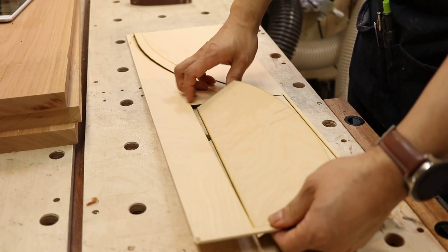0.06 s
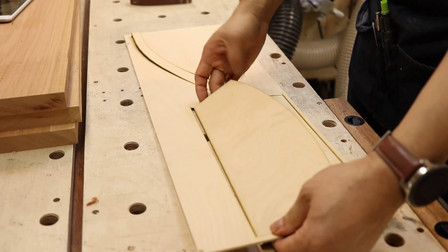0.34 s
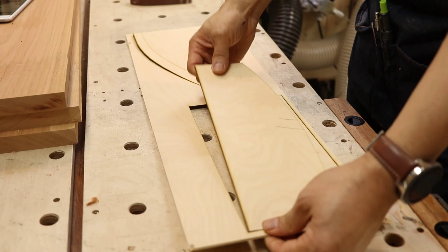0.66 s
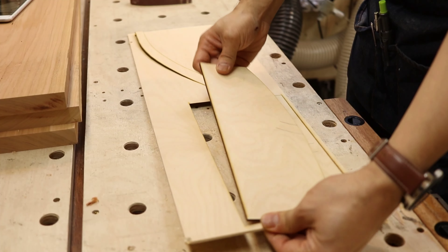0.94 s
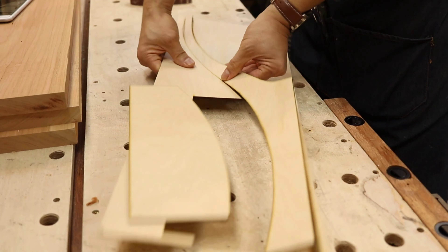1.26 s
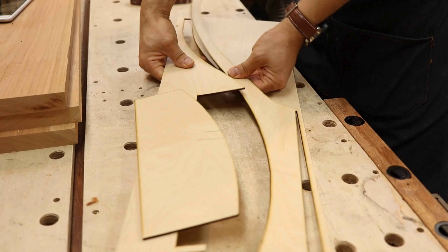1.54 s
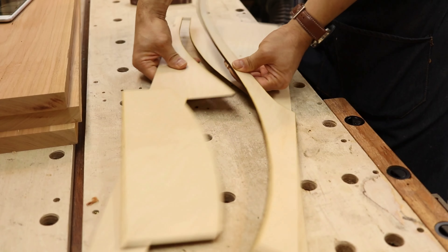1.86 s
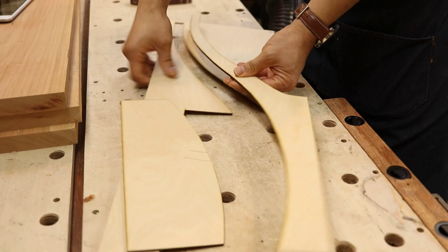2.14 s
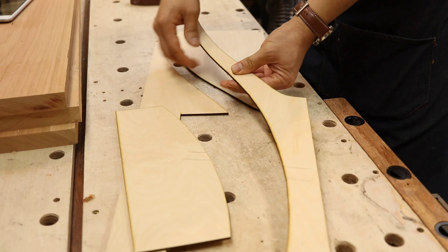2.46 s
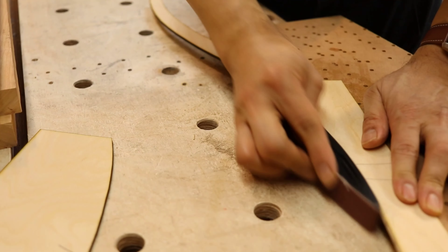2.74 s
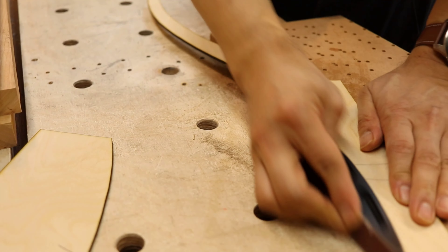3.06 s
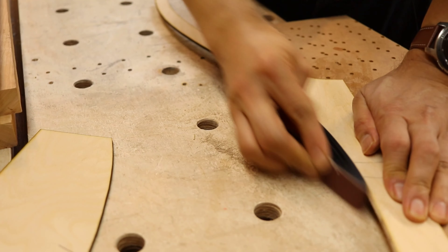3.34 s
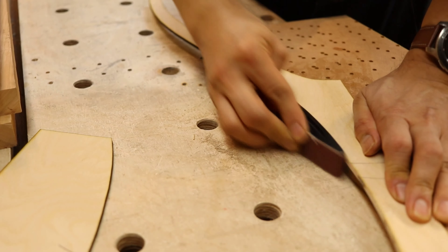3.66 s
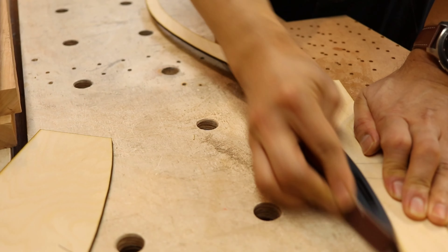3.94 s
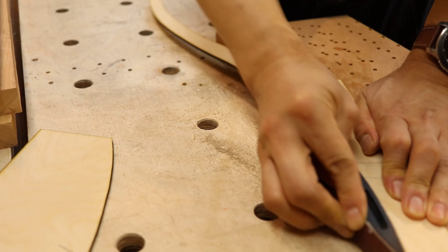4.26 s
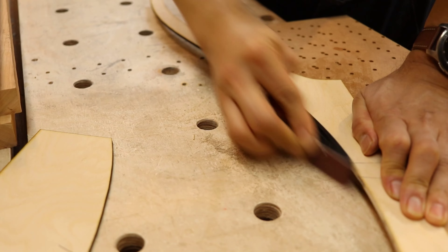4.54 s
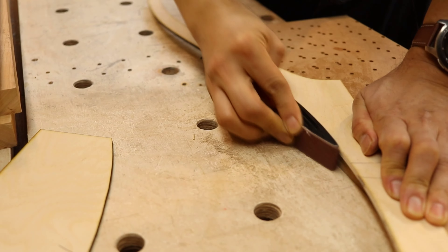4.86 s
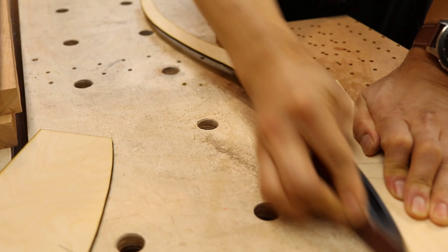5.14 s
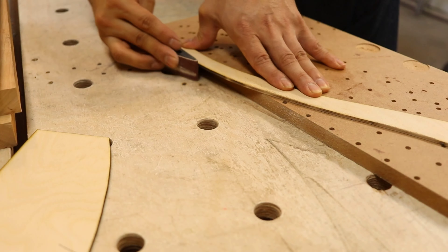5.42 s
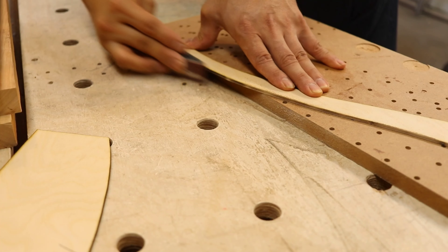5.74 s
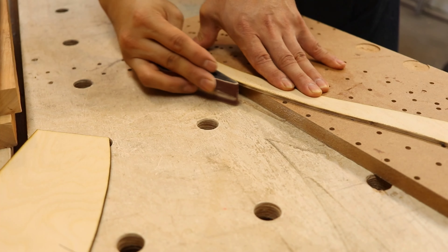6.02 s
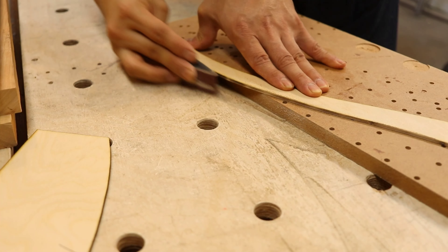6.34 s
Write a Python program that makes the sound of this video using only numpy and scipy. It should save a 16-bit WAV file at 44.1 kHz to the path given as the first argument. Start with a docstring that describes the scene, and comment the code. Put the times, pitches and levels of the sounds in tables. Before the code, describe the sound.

Light wooden knocks and scrapes from handled plywood give way to quick, rhythmic hand sanding in a small, quiet workshop.

```python
"""Plywood pieces and a sanding block

Thin plywood pieces creak out of their cut-out sheet by stick-slip friction, clatter together as
impacts excite their bending modes, and are laid on a resonant workbench. Then a sanding block rasps
back and forth along an edge; the faster it moves, the more grains strike each second and the higher
its grit sings. One close microphone hears it all in a small, quiet workshop."""
import sys
import numpy as np
from scipy import signal
from scipy.fft import rfft, irfft, next_fast_len
from scipy.io import wavfile
from scipy.ndimage import uniform_filter1d, map_coordinates

SR = 44100
rng = np.random.default_rng(int(sys.argv[2]) if len(sys.argv) > 2 else 0)


def int16_out(signal):
    """Quantize to a 16-bit WAV file."""
    q = np.round(np.clip(np.atleast_2d(signal).T, -1, 1) * 32767)
    wavfile.write(sys.argv[1], SR, q.astype(np.int16))


N = 281621
TIME = np.arange(N) / SR
SHORT = 8192  # samples in one contact sound
SHORT_T, SHORT_HZ = np.arange(SHORT) / SR, np.fft.rfftfreq(SHORT, 1 / SR)

# wooden contacts: t/s, peak level/dB, relative thud/dB, relative crack/dB, contact pitch/Hz
IMPACTS = [(0.387, -21.5, -18.5, -15, 2300), (0.397, -23, -27, -14, 2770), (0.439, -22, -39, -12, 3360),
           (0.45, -17.5, -18.5, -12, 886), (0.518, -24, -16.5, -13.5, 860), (0.801, -25, -45, -13, 1510),
           (0.814, -24.5, -22, -15.5, 1480), (1.103, -25, -54, -10.5, 3680), (1.141, -31, -21, -16, 810),
           (1.216, -28, -22, -11.5, 3570), (1.304, -23, -31, -14, 1100), (1.327, -16.5, -43, -15, 2380),
           (1.332, -17.5, -44, -13.5, 3700), (1.377, -17.5, -36, -24, 1480), (1.38, -14, -31, -30, 2260),
           (1.385, -14, -38, -14, 3500), (1.402, -22.5, -19.5, -16, 800), (1.528, -33, -19, -19, 820),
           (1.659, -25, -29, -8, 2760), (1.668, -9, -30.5, -13.5, 3420), (1.675, -13.5, -25, -21, 3020),
           (1.707, -23.5, -35, -22, 3150), (1.719, -14, -42, -13.5, 3180), (1.723, -18, -33, -11, 3420),
           (1.897, -23.5, -43, -10, 3000), (1.902, -19.5, -45, -8.5, 1360), (1.914, -21, -50, -17, 2100),
           (1.939, -16, -26, -21, 2150), (1.954, -19.5, -17, -12, 1760), (1.966, -20.5, -21.5, -44, 990),
           (2.012, -25, -18, -17, 2210), (2.025, -15.5, -31, -38, 2120), (2.062, -33.5, -26, -5, 974),
           (2.148, -36, -26, -36, 1770), (2.295, -34, -31, -8, 3620), (2.354, -26.5, -12, -11.5, 940),
           (2.542, -43, -21, -23, 2860), (2.79, -43, -20, -14, 2870), (2.822, -40.5, -4.5, -12, 721),
           (6.192, -30, -10.5, -20, 1610)]
# spectra of a loose piece, the bench's thud and the edge's crack: f/Hz, level/dB
PLY_SPECTRUM = [(100, -25), (400, -1), (800, 4.5), (1500, 6.5), (3400, 5), (4300, -0.5), (6000, -9.5),
                (9000, -19), (16000, -28.5)]
THUD_SPECTRUM = [(50, -14.5), (140, -8), (260, -6), (390, 2), (520, 4), (900, -23), (3000, -53)]
CRACK_SPECTRUM = [(2500, -30), (4500, 6), (5900, 13), (7000, 6.5), (8200, 9), (11000, -3.5), (16000, -18)]
# resonances of a loose piece: f/Hz, width/Hz, gain/dB
PLY_RESONANCES = [(980, 43, 5.1), (1430, 100, 4.5), (2320, 85, 1.3), (3380, 42, 0.69), (3490, 150, 1.2)]
# creaks: t/s, length/s, first slip rate/Hz, last slip rate/Hz, peak level/dB, fade/dB,
# relative thud/dB, relative crack/dB, contact pitch/Hz, gain at that pitch/dB
SLIP_TRAINS = [(0.1125, 0.017, 236, 207, -21.5, -11, -38, -14.5, 2160, 13.5),
               (0.452, .016, 900, 900, -22, 9, -33, -10, 2650, 9),
               (0.6994, 0.031, 350, 230, -20, -5.5, -35, -10, 1940, 5),
               (0.737, 0.018, 320, 295, -24, 18, -34, -23, 1600, 3)]
# course of the squeal: t/s, f/Hz, level/dB
SQUEAL_CONTOUR = [(.452, 930, -52), (.457, 926, -34.5), (.464, 896, -24.5), (.472, 882, -26),
                  (.479, 900, -35), (.483, 870, -90)]
# sanding strokes, each lasting until the next: t/s, midway level/dB, growth/dB, attack/s, release/s,
# time to top speed/s, grain rate at top speed/Hz, crackle pitch at top speed/Hz
SANDING_STROKES = [(2.846, -28.9, 1.5, 0.012, 0.15, 0.092, 2700, 2020),
                   (3.086, -30.2, 12.5, 0.027, 0.16, 0.22, 4130.0, 3110.0),
                   (3.418, -32, 0, 0.019, 0.082, 0.073, 2850, 2770),
                   (3.634, -30.5, -6.5, 0.027, 0.079, 0.16, 4890.0, 3920.0),
                   (3.855, -31, 4.5, 0.0055, 0.079, 0.072, 3420, 3230),
                   (4.053, -31, -7.5, 0.019, 0.039, 0.096, 5170.0, 3130),
                   (4.236, -30, 14, 0.002, 0.075, 0.061, 5050.0, 3360.0),
                   (4.435, -30.5, -6, 0.016, 0.043, 0.114, 5540.0, 3060),
                   (4.63, -30, 7.5, 0.033, 0.075, 0.06, 4860.0, 3650),
                   (4.834, -30.5, -11, 0.013, 0.049, 0.12, 5670.0, 3300.0),
                   (5.045, -29, 9, 0.0065, 0.066, 0.058, 3330, 3460.0),
                   (5.239, -30, -8, 0.012, 0.002, 0.11, 5190.0, 3040),
                   (5.441, -32, 5, 0.0019, 0.004, 0.05, 4970, 2910.0),
                   (5.612, -25, 23, 0.002, 0.19, 0.14, 7500.0, 5100.0),
                   (5.787, -35, -3, 0.002, 0.002, 0.081, 1710, 2120),
                   (5.957, -33.6, -15, 0.071, 0.074, 0.086, 1530, 2420.0),
                   (6.184, -35, -9.5, 0.01, 0.097, 0.11, 1900, 2200)]
# spectrum due to the spread of fibre sizes: f/crackle pitch, level/dB
GRIT_SPECTRUM = [(.06, -13.5), (.25, -6), (.5, -1.5), (.7, -0.5), (1.05, 1.5), (1.4, 0.5), (2, -2),
                 (4, -10), (11, -29.5)]
# radiation of the held piece: f/Hz, level/dB
HELD_SPECTRUM = [(40, -10.5), (150, -5.5), (400, -5.5), (750, 0.5), (1300, -1), (1900, -1.5), (3400, -3),
                 (4300, -10), (5900, -5), (7000, -11), (9000, -6.5), (15500, -15)]
# its resonances, and those that sing when the grain rate meets them: f/Hz, width/Hz, gain/dB
HELD_RESONANCES = [(135, 30, -9), (277, 36, 8.5), (491, 46, 8), (720, 55, 8), (1240, 100, 3),
                   (2360, 82, -0.5), (5330, 330, 1.5)]
SINGING_RESONANCES = [(1180, 300, 8), (2610, 230, 8), (5300, 570, 3.5)]
# pieces settling flat on the bench: t/s, level/dB, most strongly driven f/Hz
LANDINGS = [(0.116, -45, 426), (0.39, -48.5, 397), (0.461, -44, 320), (0.52, -40.5, 420),
            (1.145, -50.5, 190), (1.384, -46, 190), (2.014, -43.5, 237), (2.354, -38.5, 157)]
# modes of the bench top: f/Hz, relative level/dB, T60/s
BENCH_MODES = [(81.5, -1.5, 0.58), (141, -1.5, 0.36), (174.7, -8, 0.39), (214.5, -5, 0.47),
               (273, -34, 0.16), (307.6, 2, 0.19), (395.4, 7.5, 0.17), (496, -22, 0.2), (643, -22, 0.18),
               (840, 2, .2)]
# sliding contacts: t of firmest pressure/s, swell/s, fade/s, rub level/dB, hiss level/dB
SLIDE_GESTURES = [(.044, 0.11, 0.055, -52, -48), (.105, 0.033, .03, -52, -68),
                  (.17, 0.033, 0.11, -44.5, -65), (.25, 0.13, 0.063, -43, -49),
                  (.375, 0.15, 0.016, -54.5, -58), (.698, 0.051, .01, -55.5, -50.5),
                  (0.851, 0.026, 0.094, -47, -52.5), (1.095, 0.16, 0.023, -54.5, -60),
                  (1.155, 0.043, 0.073, -46, -50), (1.58, .06, 0.13, -57.5, -72),
                  (2.09, 0.018, 0.35, -55, -63), (2.335, .3, 0.054, -48, -48.5),
                  (2.37, 0.011, 0.039, -34, -45), (2.627, .06, 0.062, -53.5, -56.5),
                  (2.76, .04, 0.04, -57, -72)]
# spectra of wood on wood, fingers on veneer and the shop's background: f/Hz, level/dB
RUB_SPECTRUM = [(150, -9.5), (400, -4.5), (800, 2), (1500, -1), (3300, 1.5), (4500, -7.5), (6000, -8.5),
                (8000, -51), (16000, -50)]
HISS_SPECTRUM = [(4000, -8.5), (6000, 2), (8500, 4), (12000, -8), (16000, -21)]
AMBIENT_SPECTRUM = [(25, -26), (48, 8), (64, -2), (82, 6.5), (104, -40), (140, 4), (200, -17), (400, -40),
                    (620, -36), (930, -18), (1200, -14), (2700, -17.5), (6000, -19), (16000, -24.5)]
# reverberation time of the workshop: f/Hz, T60/s
ROOM_T60 = [(100, 1), (500, 0.59), (1400, 0.32), (3700, 0.27), (10000, 0.26), (16000, 0.16)]


def knocks(spiky_db=4, first_touch=3, chatter_s=0.013, halving_db=13, sheet_db=-28, sheet_t60=0.098):
    """Impact and rebound: a first touch, then a dying chatter that lasts longer in light contacts."""
    out = np.zeros(N)
    for s, db, thud_db, crack_db, contact_hz in IMPACTS:
        chatter_t60 = chatter_s * 2 ** (-db / halving_db)
        size, spread, tail = rng.standard_normal((3, SHORT))
        force = size * unit(amp(spiky_db * spread)) * amp(-60 * SHORT_T / chatter_t60)
        force[0] = first_touch
        force += tail * amp(sheet_db - 60 * SHORT_T / sheet_t60)  # bending waves linger in the sheet
        focus_db = max(17 + 0.28 * db, 4)  # harder blows rebound and leave the sheet free to ring
        add(out, s, amp(db) * plywood(force, thud_db, crack_db, contact_hz, focus_db))
    return out


def plywood(force, thud_db, crack_db, contact_hz, focus_db, focus_octaves=0.16, wood_db=-9, crest_db=8):
    """Forced response: the sheet rings, the bench thuds and the edge cracks; peak about 1."""
    focus = focus_db * bell(np.log2((SHORT_HZ + 1) / contact_hz) / focus_octaves)
    tuning = np.exp(0.048 * rng.standard_normal())  # every piece and grip shifts the modes a little
    wood = ring(force, along(PLY_SPECTRUM, SHORT_HZ) + peaks(PLY_RESONANCES, SHORT_HZ * tuning) + focus)
    thud = ring(force, along(THUD_SPECTRUM, SHORT_HZ))
    crack = ring(force, along(CRACK_SPECTRUM, SHORT_HZ))
    sound = amp(wood_db) * wood + amp(thud_db) * thud + amp(crack_db) * crack
    loudest_rms = np.sqrt(uniform_filter1d(sound ** 2, size=128).max())
    return sound / loudest_rms / amp(crest_db)


def creaks(jitter=0.1, rub_db=-17, rub_t60=0.043):
    """Stick-slip friction: a tight edge yields in jerks, each an impulse with a short rub behind it."""
    out = np.zeros(N)
    for s, length, first_hz, last_hz, db, fade_db, thud_db, crack_db, contact_hz, focus_db in SLIP_TRAINS:
        rates = np.linspace(first_hz, last_hz, int(length * (first_hz + last_hz) / 2) + 1)
        gaps = (1 + jitter * rng.standard_normal(len(rates))) / rates
        force = np.zeros(SHORT)
        for at in np.cumsum(gaps) - gaps[0]:
            slip = rng.standard_normal(SHORT) * amp(rub_db - 60 * SHORT_T / rub_t60)
            slip[0] = 1
            add(force, at, slip * amp(rng.standard_normal() - fade_db * at / length))
        add(out, s, amp(db) * plywood(force, thud_db, crack_db, contact_hz, focus_db))
    return out


def squeal(waver=0.029, rasp_db=-5, overtone_db=-10):
    """Self-excited oscillation: an edge coming free slips so fast it sings, rasping once a cycle."""
    hz, db, gate = curves(SQUEAL_CONTOUR)
    phase = 2 * np.pi * np.cumsum(hz * (1 + waver * wobble(400))) / SR
    tone = np.sin(phase) + amp(overtone_db) * (np.sin(2 * phase) + np.sin(3 * phase) / 2)
    rasp = coloured(rng.standard_normal(N) * (1 + np.cos(phase)) ** 2, RUB_SPECTRUM)
    return gate * amp(db) * (unit(tone) + amp(rasp_db) * rasp)


def sanding(grain_db=1.0, chatter_db=-0.04, judder_db=1.1, patchy_db=1.5, trim_db=-0.12):
    """Abrasion: grit tears fibres in a broad rasp; a band at the grain rate sweeps the resonances."""
    db, grain_hz, crackle_hz = hand_motion()
    catches = rng.standard_normal(N) * amp(grain_db * wobble(5000) + chatter_db * wobble(350))
    hz, t, spectra = signal.stft(catches, SR, nperseg=512)
    gain_db = along(GRIT_SPECTRUM, hz[:, None] / np.interp(t, TIME, crackle_hz))
    detune_octaves = np.log2((hz[:, None] + 1) / np.interp(t, TIME, grain_hz))
    gain_db += bell(detune_octaves / .24) * (1 + peaks(SINGING_RESONANCES, hz))[:, None]
    gain_db += (along(HELD_SPECTRUM, hz) + peaks(HELD_RESONANCES, hz))[:, None]
    # the contact travels along the edge and so favours ever different bending modes
    patches = uniform_filter1d(rng.standard_normal(spectra.shape), size=3, axis=0)
    gain_db += patchy_db * unit(uniform_filter1d(patches, size=7, axis=1))
    gain = amp(gain_db) / np.linalg.norm(amp(gain_db), axis=0)
    rasp = unit(signal.istft(spectra * gain, SR, nperseg=512)[1][:N])
    started = TIME >= SANDING_STROKES[0][0]
    return started * amp(db + trim_db + judder_db * wobble(70)) * rasp


def hand_motion(end_s=6.4, surge_s=0.054, arch_db=9.5, turn_db=27,
                slow_grain_hz=1230, slow_crackle_hz=1680):
    """Reciprocating motion: each stroke bites, surges and brakes to turn; pitch rises with speed."""
    rows = np.array(SANDING_STROKES)
    stroke = np.maximum(np.searchsorted(rows[:, 0], TIME) - 1, 0)
    start, level_db, growth_db, attack, release, fastest, top_grain_hz, top_crackle_hz = rows[stroke].T
    end = np.append(rows[1:, 0], end_s)[stroke]
    progress = np.clip((TIME - start) / (end - start), 0, 1)
    biting = np.clip(1 - (TIME - start) / attack, 0, 1)
    braking = np.clip(1 - (end - TIME) / release, 0, 1)
    db = level_db + growth_db * (progress - .5) - arch_db * (2 * progress - 1) ** 2
    db -= turn_db * (biting ** 2 + braking ** 2)
    speed = bell((TIME - start - fastest) / surge_s) * (1 - braking)
    grain_hz = slow_grain_hz * (top_grain_hz / slow_grain_hz) ** speed
    crackle_hz = slow_crackle_hz * (top_crackle_hz / slow_crackle_hz) ** speed
    return db, grain_hz, crackle_hz


def bench_booms(falloff_db=7, attack_s=0.0044):
    """Free vibration: a piece landing flat sets the damped modes of the bench top booming."""
    out, t = np.zeros(N), np.arange(SR // 2) / SR
    hz, mode_db, t60 = np.transpose(BENCH_MODES)[:, :, None]
    for s, db, struck_hz in LANDINGS:
        strength_db = mode_db - falloff_db * np.log2(hz / struck_hz) ** 2
        modes = amp(strength_db - 60 * t / t60) * np.sin(2 * np.pi * (hz * t + rng.random(hz.shape)))
        add(out, s, amp(db) * modes.sum(0) * (1 - np.exp(-t / attack_s)))
    return out


def slides(range_db=23.5, grain_db=2, rub_trim_db=-1.5, hiss_trim_db=-3.5):
    """Sliding friction: wood rubs on wood and fingers hiss on veneer, louder under firmer pressure."""
    rub, hiss = np.zeros((2, N))
    for s, swell, fade, rub_db, hiss_db in SLIDE_GESTURES:
        pressure = amp(-range_db * np.maximum((s - TIME) / swell, (TIME - s) / fade))
        rub += amp(rub_db + rub_trim_db) * pressure
        hiss += amp(hiss_db + hiss_trim_db) * pressure
    grains = rng.standard_normal((2, N)) * amp(grain_db * wobble(700))
    return rub * coloured(grains[0], RUB_SPECTRUM) + hiss * coloured(grains[1], HISS_SPECTRUM)


def workshop(x, room_db, onset_s=0.00099, size=16384):
    """Reverberation: echoes from bench and walls vary as the hands move; the treble dies first."""
    out, window = x.copy(), signal.get_window("hann", size)
    padded = np.pad(x, (0, size))
    for start in range(0, N, size // 2):
        block = padded[start:start + size]
        if not block.any():
            continue
        hz, t, spectra = signal.stft(rng.standard_normal(size), SR, nperseg=256)
        decay = amp(-60 * t / along(ROOM_T60, hz)[:, None])
        tail = signal.istft(spectra * decay, SR, nperseg=256)[1]
        tail *= 1 - np.exp(-(np.arange(len(tail)) / SR / onset_s) ** 2)
        echoes = signal.fftconvolve(block * window, tail / np.linalg.norm(tail))
        add(out, start / SR, amp(room_db) * echoes)
    return out


def ambient(level_db=-64):
    """Stationary noise: the low rumble and faint hiss of the shop."""
    return amp(level_db) * coloured(rng.standard_normal(N), AMBIENT_SPECTRUM)


def amp(db):
    """Decibels to amplitude ratio."""
    return 10 ** (np.asarray(db) / 20)


def unit(x):
    """x scaled to rms 1."""
    return x / np.sqrt(np.mean(x ** 2) + 1e-20)


def bell(x):
    """Gaussian curve of height 1."""
    return np.exp(-.5 * x ** 2)


def along(points, hz):
    """(f, value) points interpolated on a logarithmic frequency axis."""
    f, value = np.transpose(points)
    return np.interp(np.log(hz + 1e-6), np.log(f), value)


def peaks(modes, hz):
    """Resonance: the gain/dB of a sum of Lorentzian peaks."""
    return sum(db / (1 + (2 * (hz - centre) / width) ** 2) for centre, width, db in modes)


def curves(rows):
    """Each column interpolated over time, then a gate that is open during the table's span."""
    s, *columns = np.transpose(rows)
    return [np.interp(TIME, s, c) for c in columns] + [(TIME >= s[0]) & (TIME <= s[-1])]


def wobble(rate):
    """Random modulation: a smooth curve with rate knots a second."""
    return map_coordinates(rng.standard_normal(int(N * rate / SR) + 4), [TIME * rate])


def filtered(x, gain):
    """Zero-phase filtering: the spectrum of x times gain(f)."""
    size = next_fast_len(N + SHORT)
    return irfft(rfft(x, size) * gain(np.fft.rfftfreq(size, 1 / SR)), size)[..., :N]


def coloured(x, spectrum):
    """Spectral shaping by (f/Hz, level/dB) points; rms 1."""
    return unit(filtered(x, lambda hz: amp(along(spectrum, hz))))


def ring(force, db):
    """Causal response to a short force of a minimum-phase body whose spectrum is db; rms 1."""
    cepstrum = irfft(np.log(amp(db)))
    cepstrum[1:SHORT // 2] *= 2
    cepstrum[SHORT // 2 + 1:] = 0
    return unit(irfft(rfft(force) * np.exp(rfft(cepstrum))))


def add(track, s, sound):
    """Mix a short sound in at time s."""
    part = track[max(round(s * SR), 0):][:len(sound)]
    part += sound[:len(part)]


def scene():
    """Superposition: all sources sum at one microphone, which feeds both channels."""
    handling = workshop(knocks() + creaks() + slides(), room_db=-5.5)
    handling += workshop(squeal(), room_db=-11.5) + bench_booms()
    mono = handling + workshop(sanding(), room_db=-9.0) + ambient()
    return np.array([mono, mono])


def record(dry, top_hz=16100):
    """Band limiting: an ideal low-pass filter removes the highest treble."""
    return filtered(dry, lambda hz: hz < top_hz)


dry = scene()
out = record(dry)
int16_out(out)
```